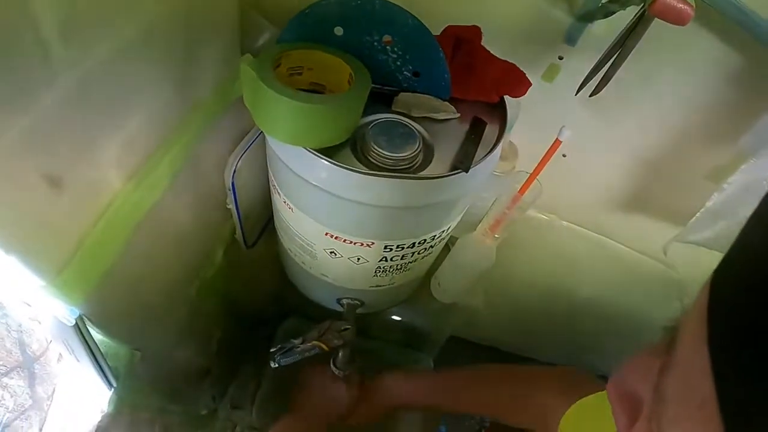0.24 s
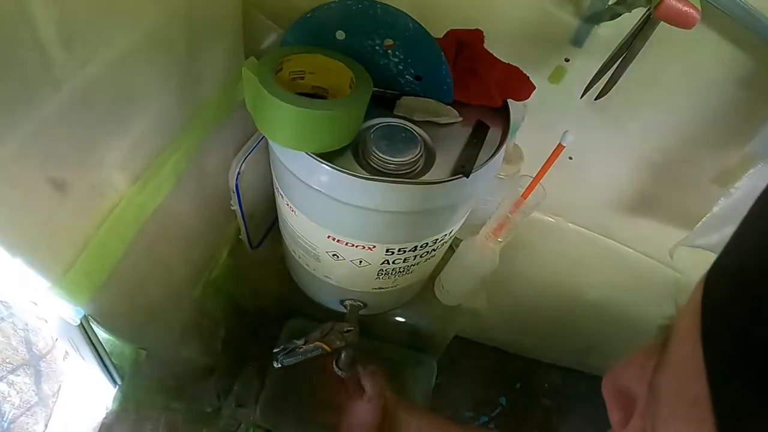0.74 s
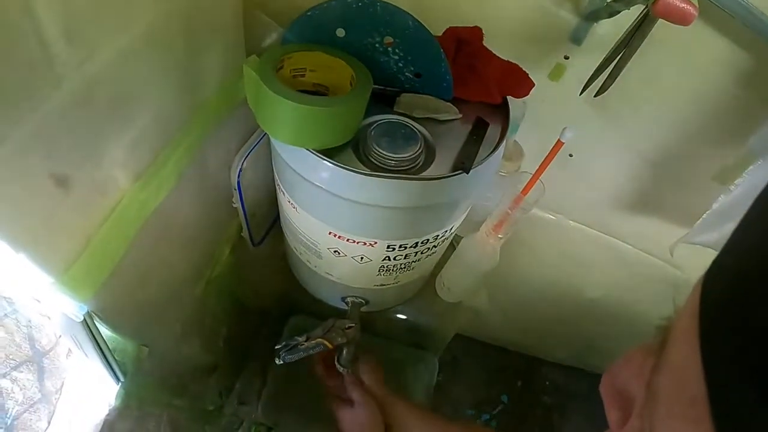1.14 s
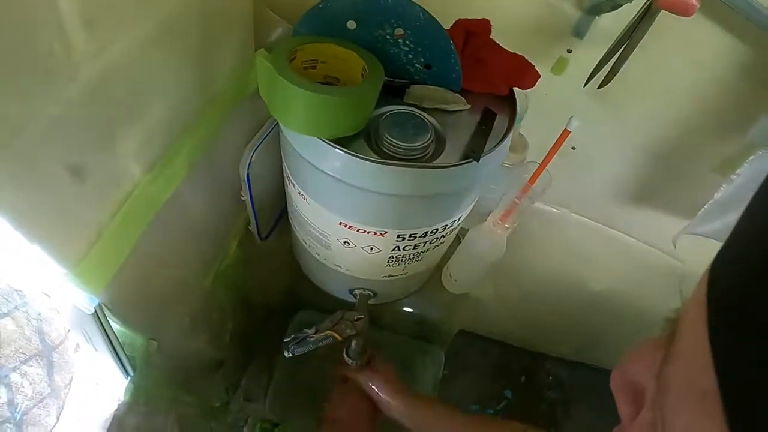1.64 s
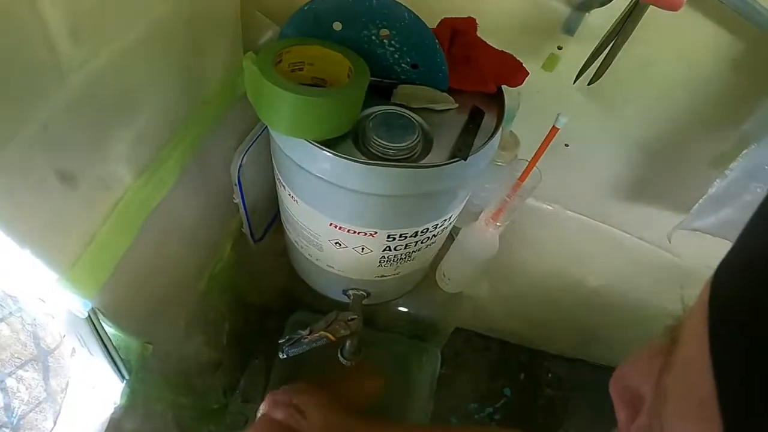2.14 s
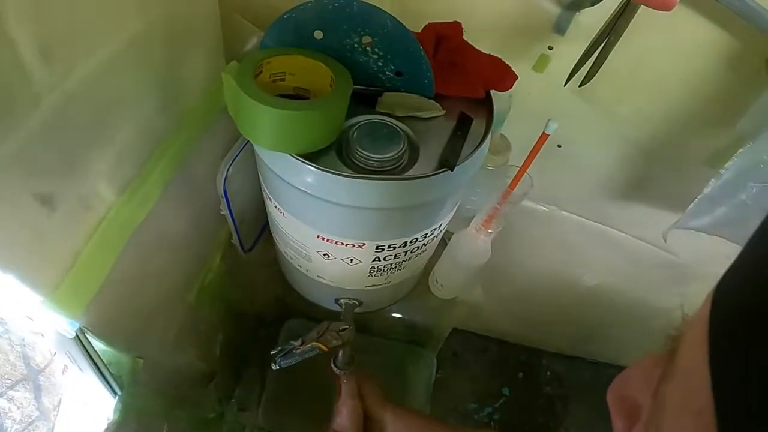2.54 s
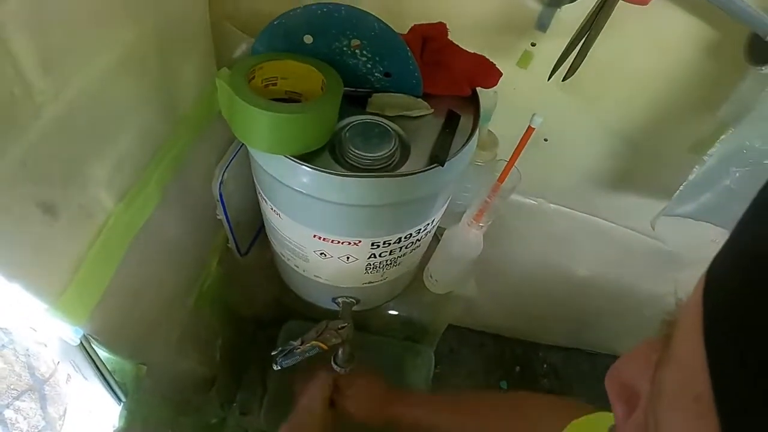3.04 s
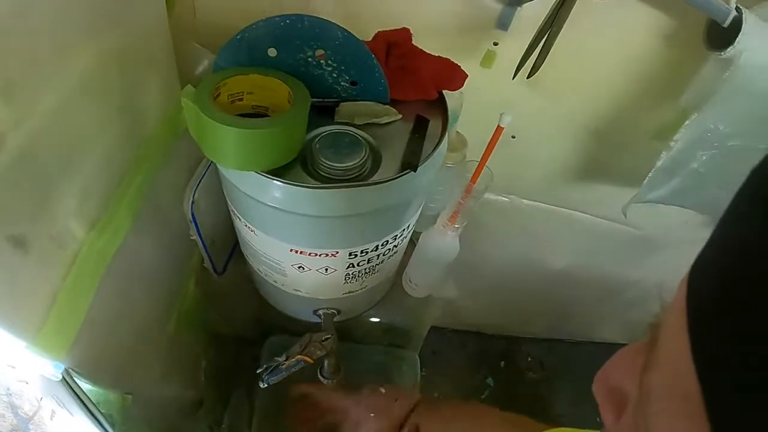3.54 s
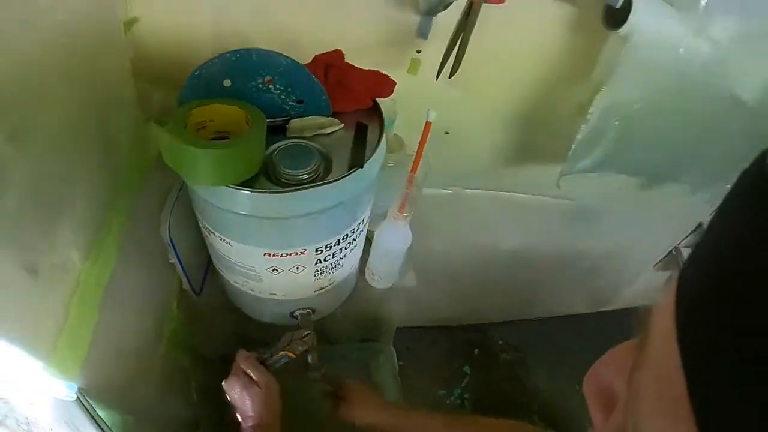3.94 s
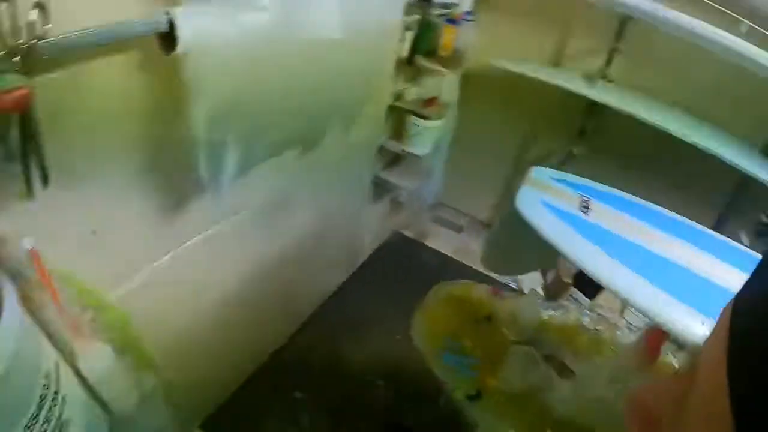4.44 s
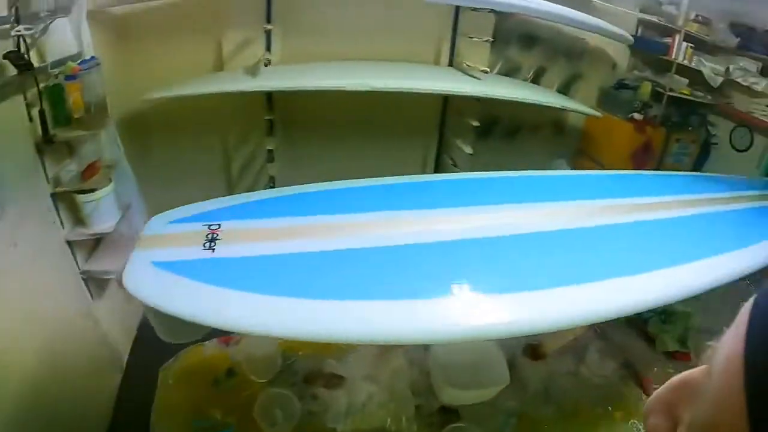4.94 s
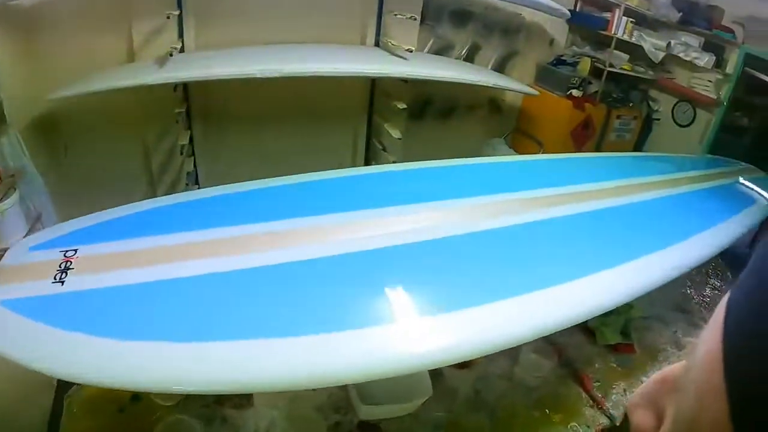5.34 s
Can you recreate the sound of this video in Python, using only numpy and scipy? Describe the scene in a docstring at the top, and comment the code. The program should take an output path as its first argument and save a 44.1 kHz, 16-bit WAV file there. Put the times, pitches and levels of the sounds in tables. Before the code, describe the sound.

From 0 s, a thin stream spatters over rubbing hands in a small workshop, heard from a head-worn microphone. Fine, bright bubbling and fizz swell in short irregular strokes, with a softer, lower squelch underneath. High ringing drops plink singly and in clusters, notably around 0.6, 1.35, 3.5 and 4.4 s. Dull, slightly hollow smacks of wet hands begin at about 0.1 s, gather around 0.9-1.8 s, and return around 4.2-5.2 s. A sharp spatter stands out near 3.5 s. Faint air hiss and low machine drone waver behind, with a tiny wall reflection. Low sways and bumps disturb the microphone throughout. The last drop falls at 4.8 s, a firm smack follows at 4.9 s, and the strongest deep jolt arrives near 5.1 s as the head turns; the wet rubbing thins out and hum remains until about 5.6 s.

```python
"""A workshop hums from the first moment while a head-worn microphone sways: coloured noise with drifting levels.
At once wet hands rub under a thin stream: bubble grains and fizz make bright spatter and lower squelch.
Ringing drops fall from the start until 4.8 s, and soon dull smacks of hand on hand join in: noise puffs with
a ringing air pocket. Jolts shake the microphone throughout, the strongest near 5.1 s as the head turns away,
after the last drop. The hands get a short wall return; they and the hum excite the microphone's cavity."""
import sys
import numpy as np
from scipy import signal
from scipy.fft import rfft, irfft
from scipy.io import wavfile
from scipy.ndimage import uniform_filter1d

SR = 44100
rng = np.random.default_rng(int(sys.argv[2]) if len(sys.argv) > 2 else 0)


def natural_amplitude(level_db):
    """Convert a level in decibels to a linear amplitude factor, elementwise."""
    exponent = np.asarray(level_db, float) / 20
    return 10 ** exponent


def inscribe(sig):
    """Save sig as 16-bit PCM at rate SR to the path in sys.argv[1].

    A 1-D sig is mono; a 2-D sig holds one channel per row.
    Samples are clipped to [-1, 1] before scaling.
    """
    pcm = np.round(np.clip(np.atleast_2d(sig).T, -1, 1) * 32767)
    wavfile.write(sys.argv[1], SR, pcm.astype(np.int16))


N = 246122  # length in samples


def rms_one(x):
    """Scale to rms 1."""
    return x / np.sqrt(np.mean(x ** 2) + 1e-20)


def peak_one(x):
    """Scale to height 1."""
    return x / np.max(np.abs(x))


def in_time(rows):
    """Columns of a curve over time, read at every sample."""
    s, *columns = np.transpose(rows)
    return [np.interp(np.arange(N) / SR, s, column) for column in columns]


def at_hz(points):
    """A table over frequency, read at every FFT bin along a log axis."""
    hz, value = np.transpose(points)
    bins_hz = np.arange(N // 2 + 1) * SR / N
    return np.interp(np.log(bins_hz + 1), np.log(hz + 1), value)


def colour(x, spectrum):
    """Minimum-phase filter from a (Hz, dB) table, so that nothing sounds early."""
    cepstrum = irfft(np.log(natural_amplitude(at_hz(spectrum))), N)
    # fold the cepstrum onto positive time
    cepstrum[1:N // 2] *= 2
    cepstrum[N // 2 + 1:] = 0
    response = np.exp(rfft(cepstrum))
    return irfft(rfft(x) * response, N)


def band(x, low_hz, high_hz, order=2):
    """Butterworth band-pass."""
    sos = signal.butter(order, [low_hz, high_hz], "band", fs=SR, output="sos")
    return signal.sosfilt(sos, x)


def drift(corner_hz):
    """Slow random wander of rms 1: noise through two equal poles, computed at every 40th sample."""
    r = np.exp(-2 * np.pi * corner_hz * 40 / SR)
    noise = rng.standard_normal(N // 40 + 2002)
    slow = signal.lfilter([1], [1, -2 * r, r * r], noise)[2000:]  # skip the settling
    return np.interp(np.arange(N) / 40, np.arange(len(slow)), rms_one(slow))


def swells(floor_db, s, hold_s, peak_db, rise, fall):
    """Gain of events that rise, hold and fall in dB per second, added in power to a floor."""
    t = np.arange(0, N, 16) / SR
    power = 0
    for start, hold, db in zip(s, hold_s, peak_db):
        before = np.maximum(start - t, 0)
        after = np.maximum(t - start - hold, 0)
        power = power + natural_amplitude(2 * (db - rise * before - fall * after))
    return np.sqrt(natural_amplitude(2 * floor_db) + np.interp(np.arange(N) / SR, t, power))


def ring(clicks, hz, t60):
    """Two-pole resonator: a unit click sets a sine of height about 1 ringing, down 60 dB after t60 seconds."""
    r, w = natural_amplitude(-60 / (t60 * SR)), 2 * np.pi * hz / SR
    return signal.lfilter([0, np.sin(w)], [1, -2 * r * np.cos(w), r * r], clicks + 1e-18)


def burst(rise_s, decay_s):
    """A puff of noise with an exponential rise and decay."""
    t = np.arange(4000) / SR
    return rng.standard_normal(len(t)) * (1 - np.exp(-t / rise_s)) * np.exp(-t / decay_s)


def grains(per_s, low_hz, high_hz, cycles, spread_db, clump_db, fizz):
    """Tiny bubbles burst in clumps at scattered pitches, over smooth fizz that differs a little by side."""
    clumps = natural_amplitude(clump_db * drift(25))
    sizes = natural_amplitude(spread_db * np.minimum(rng.exponential(1, N), 4)) * rng.choice([-1, 1], N)
    born = rng.random(N) < per_s * clumps / SR
    pitches = np.geomspace(low_hz, high_hz, 16)
    dealt = rng.integers(0, 16, N)
    rings = 0
    for k, hz in enumerate(pitches):
        clicks = sizes * born * (dealt == k)
        # ringing twice gives each bubble a soft start and a clear pitch
        blips = ring(ring(clicks, hz, cycles / hz), hz, cycles / hz / 3)
        rings = rings + rms_one(blips) * np.sqrt(hz)
    mid, side = rng.standard_normal((2, N))
    return rms_one(rings) + fizz * np.sqrt(clumps) * (mid + 0.17 * side * [[1], [-1]])


# how alike room noise is on the two sides: (frequency [Hz], left-right correlation [0..1])
SIDE_LIKENESS = [(60, 0.58), (120, 0.97), (240, 0.43), (470, 0.15), (920, 0.19), (1830, 0.92), (3620, 0.64),
                 (7170, 1), (11000, 0.26)]


def room_noise(spectrum):
    """Steady noise of the given colour, partly unlike on the two sides; rms 1."""
    alike = np.clip(at_hz(SIDE_LIKENESS), 0, 1)
    mid, side = rfft(rng.standard_normal((2, N)))
    pair = np.sqrt(1 + alike) * mid + np.sqrt(1 - alike) * side * [[1], [-1]]
    return rms_one(colour(irfft(pair, N), spectrum))


# colour of the air hiss: (frequency [Hz], relative density [dB])
HISS_COLOUR = [(150, -20.5), (271, -4), (901, -12.5), (1030, -6.5), (1700, -2.5), (2380, -11),
               (4300, -10.5), (6500, -15), (7200, -22), (10200, -29), (11000, -53), (14000, -79.5)]
# colour of the machine drone: (frequency [Hz], relative density [dB])
DRONE_COLOUR = [(70, -68), (115, -6.5), (150, 5), (200, 6.5), (270, -8.5), (500, -51.5)]
# background as the head turns: (time [s], hiss level [dB], drone level [dB])
BACKGROUND = [(0.0, -61.5, -71), (0.6, -64, -69), (1.2, -65.5, -73), (1.7, -62.5, -69.5),
              (2.9, -65.5, -68.5), (3.7, -63, -69.5), (4.3, -61, -63), (4.5, -62.5, -71.5),
              (4.9, -63.5, -63.5), (5.25, -60.5, -62.5), (5.58, -64.5, -74)]


def hum():
    """Air hiss and a low machine drone fill the room, as coloured noises whose levels waver."""
    hiss_db, drone_db = in_time(BACKGROUND)
    hiss = natural_amplitude(hiss_db + drift(5.8)) * room_noise(HISS_COLOUR)
    drone = natural_amplitude(drone_db + 2.25 * drift(8.4)) * room_noise(DRONE_COLOUR)
    return hiss + drone


# restless head: (time [s], sway level [dB])
SWAY_LEVEL = [(0.0, -42.5), (0.12, -44), (0.27, -56.5), (0.5, -47), (0.8, -38.5), (1.05, -42.5),
              (1.28, -66), (1.56, -42), (2.0, -38.5), (2.25, -41), (2.8, -50.5), (3.2, -46.5), (3.4, -58.5),
              (3.8, -39.5), (4.2, -52), (4.6, -51.5), (5.0, -44), (5.58, -50.5)]
# jolts of the head: (time [s], sway level [dB], knocking level [dB])
HEAD_JOLTS = [(0.02, -38, -51.5), (0.13, -54, -64), (0.88, -34.5, -54), (1.13, -34, -65),
              (1.35, -43.5, -74), (1.8, -47, -63), (2.39, -35, -71), (2.66, -41, -67), (2.909, -39.5, -80),
              (3.06, -60, -56.5), (3.5, -35.5, -70), (3.78, -40, -63), (4.07, -37.5, -61), (4.32, -40, -60),
              (4.752, -31.5, -72), (4.88, -37, -66), (5.0, -49, -48), (5.078, -23.5, -52.5),
              (5.21, -31, -54), (5.28, -37.5, -61)]


def rumble():
    """The moving head shakes the housing: smooth sways and a knocking above, nearly equal on both sides."""
    s, sway_db, knock_db = np.transpose(HEAD_JOLTS)
    slopes = 217, 210  # rise and fall, dB per second
    sway_floor_db = in_time(SWAY_LEVEL)[0] + 2.0 * drift(2.0)
    knock_floor_db = -84.5 + 2.4 * drift(5.0)
    sway_gain = swells(sway_floor_db, s, 0 * s, sway_db, *slopes)
    knock_gain = swells(knock_floor_db, s, 0 * s, knock_db, *slopes)
    # the first second, where the filters settle, is dropped
    sway = band(rng.standard_normal(N + SR), 9.8, 31.8, order=2)[SR:]
    knock = band(rng.standard_normal(N + SR), 42, 92, order=3)[SR:]
    # the sway keeps a fairly even swing from cycle to cycle
    sway = sway / (uniform_filter1d(np.abs(sway), size=2400) + 2.0 * np.std(sway))
    # the heavy housing cannot follow fast changes
    inertia = signal.butter(4, 44, fs=SR, output="sos")
    shake = signal.sosfilt(inertia, sway_gain * rms_one(sway)) + knock_gain * rms_one(knock)
    # the left port feels it a few samples before the right, by a wavering amount
    lead = 5 * np.gradient(shake) * natural_amplitude(5 * drift(4))
    return shake + lead * [[1], [-1]]


# colour of the bright spatter: (frequency [Hz], relative density [dB])
SPATTER_COLOUR = [(1000, -49), (1800, 3), (2300, -6.5), (3300, -5), (4200, 1), (5300, -3.5), (6700, -1),
                  (7200, -9.5), (8500, -9.5), (10200, -22.5), (11000, -29.5), (12500, -21), (14000, -92)]
# colour of the squelch: (frequency [Hz], relative density [dB])
SQUELCH_COLOUR = [(120, -17), (200, 3.5), (450, -5.5), (800, -11), (1150, 2), (1750, -2), (2200, -11.5),
                  (3000, -4), (4000, -34)]
# trickle over the hands: (time [s], spatter level [dB])
TRICKLE_LEVEL = [(0.0, -81), (0.3, -60.5), (0.62, -59.5), (0.9, -68.5), (1.3, -69), (1.5, -69), (1.9, -84),
                 (2.3, -62.5), (2.5, -57), (2.7, -73.5), (3.3, -66.5), (3.9, -68), (4.2, -68),
                 (4.33, -60.5), (4.6, -68.5), (5.58, -74)]
# rubbing strokes and splashes: (start time [s], hold [s], spatter level [dB], squelch level [dB])
RUB_STROKES = [(0.013, 0.11, -56.5, -65), (0.25, 0.017, -73, -88), (0.626, .04, -61, -91),
               (0.777, 0.021, -59.5, -69.5), (0.887, 0.074, -72, -63), (1.07, 0.02, -64, -60.5),
               (1.354, 0.023, -58.5, -84), (1.41, 0.14, -61.5, -90), (1.654, 0.047, -56, -59.5),
               (1.822, 0.051, -55.5, -60.5), (1.982, 0.041, -59.5, -65.5), (2.107, 0.035, -57.5, -64),
               (2.197, 0.055, -54, -71), (2.293, 0.058, -81, -64.5), (2.519, 0.019, -56.5, -78),
               (2.731, 0.0058, -60.5, -87), (2.897, 0.092, -65, -76.5), (3.094, 0.016, -58.5, -70),
               (3.175, 0.017, -56, -68), (3.396, 0.03, -60.5, -63.5), (3.507, 0.015, -48, -61),
               (3.657, 0.095, -60, -92), (3.85, 0.13, -86, -65), (4.217, 0.0063, -58.5, -59.5),
               (4.25, .05, -66, -59), (4.38, 0.013, -54.5, -79), (4.514, 0.011, -74, -56.5),
               (4.675, 0.016, -64, -64.5), (4.764, 0.059, -69, -60), (4.882, 0.0084, -55, -59),
               (5.055, 0.19, -77, -65), (5.356, 0.032, -64, -66.5)]


def wash():
    """Bright spatter and the lower squelch of liquid squeezed between the palms swell with each stroke."""
    s, hold_s, spatter_db, squelch_db = np.transpose(RUB_STROKES)
    slopes = 500, 255  # rise and fall, dB per second
    squelch_floor_db = -76.5
    spatter = grains(1200, 2300, 7500, 45.0, spread_db=3.5, clump_db=2.5, fizz=1.05)
    squelch = grains(400, 400, 2800, 12.0, spread_db=3.0, clump_db=1.5, fizz=1.1)
    spatter_gain = swells(in_time(TRICKLE_LEVEL)[0], s, hold_s, spatter_db, *slopes)
    squelch_gain = swells(squelch_floor_db, s, hold_s, squelch_db, *slopes)
    return (spatter_gain * rms_one(colour(spatter, SPATTER_COLOUR))
            + squelch_gain * rms_one(colour(squelch, SQUELCH_COLOUR)))


# single drops: (time [s], level [dB], pitch [Hz], lower plink re level [dB], mist re level [dB])
WATER_DROPS = [(0.0148, -32.5, 3750, -22, -30), (0.241, -31.5, 6060, -34, -29),
               (0.252, -33.5, 6400, -27, -29), (0.2672, -36, 4560, -25, -32),
               (0.362, -36, 6060, -18.5, -15), (0.4485, -31.5, 6100, -32, -34),
               (0.4828, -36, 5610, -16, -9.5), (0.5383, -37, 5540, -28, -20),
               (0.589, -32.5, 4870, -31, -29), (0.592, -28, 3900, -33, -30), (0.643, -49, 4360, -8, 1),
               (0.8005, -40, 4290, -17, -25), (0.8731, -34, 4340, -37, -15),
               (0.9748, -40.5, 4830, -33, -13), (1.1923, -39, 6800, -32, -15),
               (1.2815, -37.5, 6070, -42, -19), (1.354, -25.5, 4600, -32, -27),
               (1.359, -28.5, 4500, -34, -18), (1.3887, -30.5, 6700, -27, -19),
               (1.4278, -38.5, 6030, -15, -20), (1.467, -45, 4900, -5, -32),
               (1.5255, -38.5, 4800, -12, -34), (1.6413, -30, 4690, -30, -32), (1.648, -37, 3620, -23, -30),
               (1.675, -31.5, 4500, -17, -16), (1.7855, -38, 5900, -36, -16), (1.8168, -38, 6200, -27, -14),
               (1.989, -38, 4400, -37, -17), (2.0343, -35, 4720, -28, -30), (2.5054, -31, 5720, -40, -19),
               (2.6005, -38, 4790, -37, -18), (2.903, -37, 5100, -35, -12), (3.016, -36.5, 6500, -38, -19),
               (3.0985, -45.5, 4800, -20, -28), (3.1787, -31, 3880, -24, -11),
               (3.474, -34.5, 4800, -16, -14), (3.503, -29, 4880, -31, -35), (3.524, -30, 4760, -18, -38),
               (3.7498, -45, 4580, -8, -5), (3.7874, -39.5, 6600, -23, -5.5), (3.944, -39, 6240, -27, -17),
               (4.2065, -27, 4730, -14.5, -32), (4.247, -45, 4960, -6, -31), (4.367, -35, 5000, -36, -12),
               (4.381, -31, 5600, -30, -27), (4.3922, -25, 5530, -33, -30), (4.397, -27, 4780, -30, -32),
               (4.4235, -30, 4450, -16, -21), (4.487, -36, 4600, -25, -27), (4.7644, -38, 4860, -33, -21)]


def drops():
    """Each drop rings briefly at its own pitch in a puff of spray, with some lower plink and fine mist."""
    out, t = np.zeros(N + 4000), np.arange(4000) / SR
    for s, level_db, hz, plink_db, mist_db in WATER_DROPS:
        tone = np.sin(2 * np.pi * hz * t) * np.exp(-t / .0035) * (1 - np.exp(-t / .0007))
        # a sharp puff with a weaker, longer tail
        puff = burst(.0003, .004) + .25 * burst(.002, .015)
        spray = peak_one(band(puff, 3400, 6800, order=4))
        plink = peak_one(band(burst(0.00055, 0.013), 2350, 3240, order=3))
        mist = peak_one(band(burst(0.000083, 0.0064), 3520, 8100, order=3))
        drop = 0.24 * tone + 0.21 * spray + natural_amplitude(plink_db) * plink + natural_amplitude(mist_db) * mist
        i = round(s * SR)
        out[i:i + 4000] += natural_amplitude(level_db) * drop
    return out[:N]


# dull smacks of hand on hand: (time [s], level [dB], air pocket pitch [Hz])
HAND_SMACKS = [(0.094, -38.5, 1460), (0.864, -36, 1265), (0.932, -45.5, 1460), (1.017, -38, 1125),
               (1.092, -36.5, 1480), (1.339, -41, 1320), (1.371, -40.5, 2040), (1.47, -41, 1665),
               (1.508, -40, 2650), (1.645, -45, 1540), (1.808, -36.5, 1578), (2.04, -38, 1580),
               (3.013, -36.5, 1496), (3.495, -45, 1570), (3.942, -36.5, 1765), (4.224, -38, 2590),
               (4.254, -36, 1490), (4.536, -35, 1560), (4.693, -40, 1598), (4.764, -37.5, 1622),
               (4.897, -30.5, 1680), (1.82, -34, 453), (5.067, -39.5, 464), (5.175, -36.5, 1733)]


def smacks():
    """Wet skin meets wet skin: a soft dull puff, with the trapped pocket of air ringing in it."""
    out = np.zeros(N + 4000)
    for s, level_db, hz in HAND_SMACKS:
        puff = peak_one(band(burst(0.00076, 0.016), 360, 2380))
        pocket = peak_one(ring(burst(0.0008, 0.0027), hz, 0.05))
        i = round(s * SR)
        out[i:i + 4000] += natural_amplitude(level_db) * (0.16 * puff + 0.19 * pocket)
    return out[:N]


def shop(x):
    """Diffuse return of the walls: a dying, dulled noise tail of its own on each side."""
    t60_s, level_db = 0.06, -10.5
    t = np.arange(SR // 2) / SR
    # the return starts 4 ms after the direct sound
    tail = rng.standard_normal((2, len(t))) * natural_amplitude(-60 * t / t60_s) * (t > .004)
    tail = signal.lfilter([1], [1, -.3], tail)
    tail = tail / np.sqrt(np.sum(tail ** 2) / 2)
    return natural_amplitude(level_db) * signal.fftconvolve(x, tail, axes=1)[:, :N]


# cavity in front of the microphone: (frequency [Hz], width [Hz], boost [dB])
CAVITY_MODES = [(1545, 200, 5), (2870, 200, 5), (4740, 260, 10), (5570, 150, 4), (6090, 270, 4),
                (6560, 200, 3)]
# level between the two ports: (frequency [Hz], left over right [dB])
PORT_LEVELS = [(60, 0.0), (100, -0.5), (170, -2.0), (300, -3.5), (500, -2.5), (860, -2.0), (1460, 3.0),
               (2480, 3.5), (3300, 2.5), (4400, -2.5), (5600, -1.5), (7170, 1.3)]
# phase between the two ports: (frequency [Hz], left ahead of right [rad])
PORT_LEADS = [(0, 0), (430, -0.1), (860, -0.5), (1120, -0.1), (1380, -0.1), (2500, -0.9), (2760, -1.0),
              (3010, -1.3), (3270, -0.9), (3700, -0.9), (4310, -0.1), (7320, 0.0)]


def housing(x):
    """The cavity boosts its resonances; the two ports differ in level and phase."""
    for hz, width_hz, boost_db in CAVITY_MODES:
        r = np.exp(-np.pi * width_hz / SR)
        poles = [1, -2 * r * np.cos(2 * np.pi * hz / SR), r * r]
        peak = signal.lfilter([(1 - r * r) / 2, 0, (r * r - 1) / 2], poles, x)
        x = x + (natural_amplitude(boost_db) - 1) * peak
    # each port takes half of the difference
    left = natural_amplitude(at_hz(PORT_LEVELS) / 2) * np.exp(.5j * at_hz(PORT_LEADS))
    return irfft(rfft(x) * [left, 1 / left], N)


def scene():
    """Hands with their room return and the hum pass the housing; the rumble arises in it."""
    background = hum()
    shaking = rumble()
    hands = wash() + drops() + smacks()
    return housing(background + hands + shop(hands)) + shaking


def band_limit(x):
    """A steep low-pass at the top of the band."""
    return signal.sosfilt(signal.butter(12, 12770, fs=SR, output="sos"), x)


def record(dry):
    """Delivers the finished mix."""
    return band_limit(dry)


dry = scene()
out = record(dry)
inscribe(out)
```